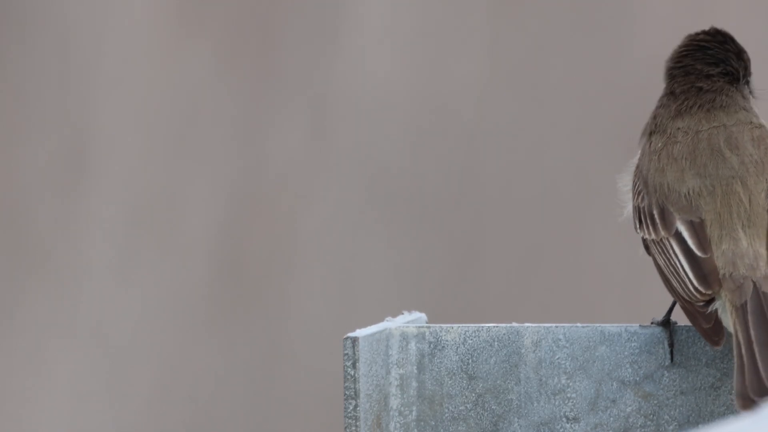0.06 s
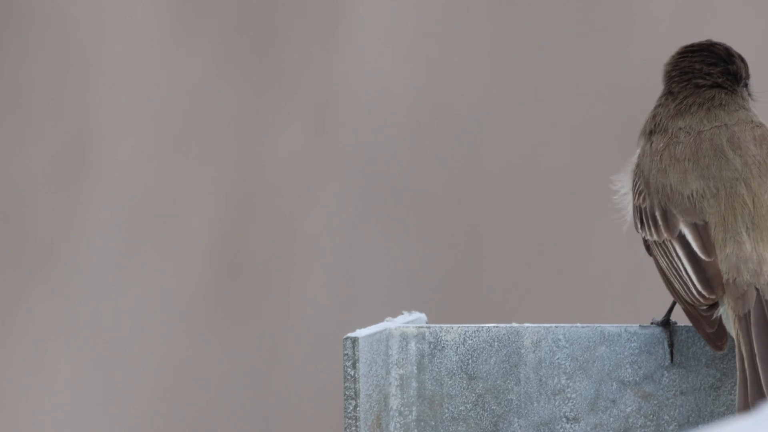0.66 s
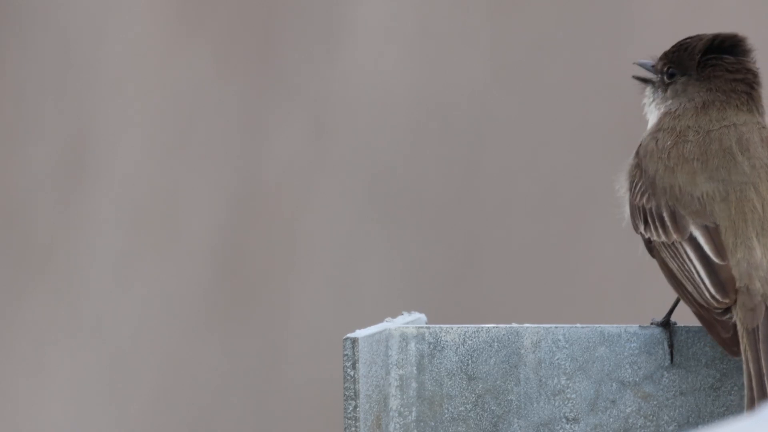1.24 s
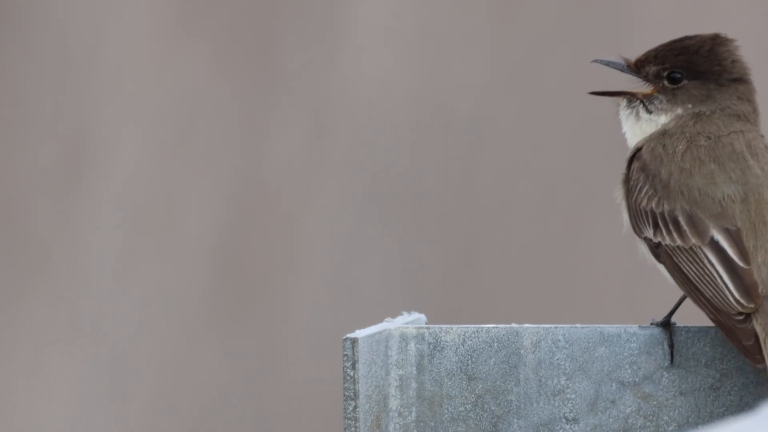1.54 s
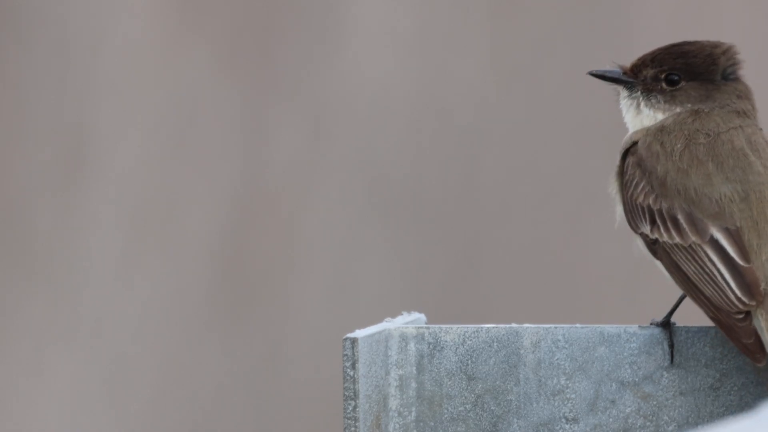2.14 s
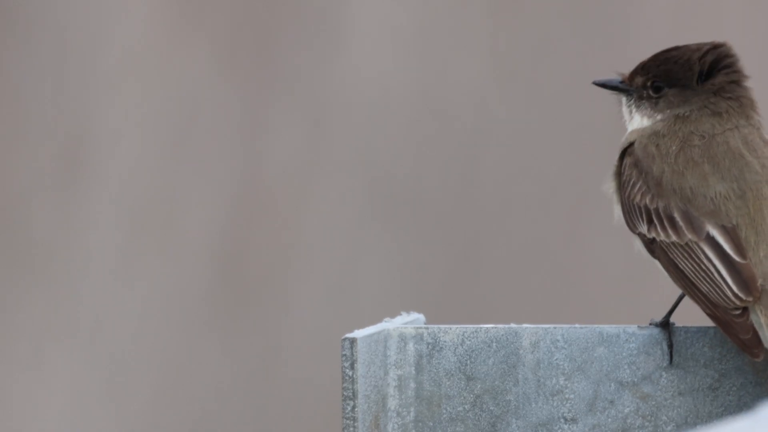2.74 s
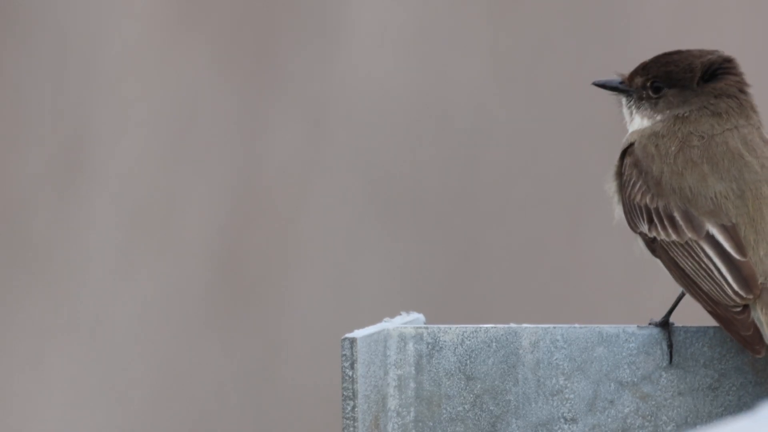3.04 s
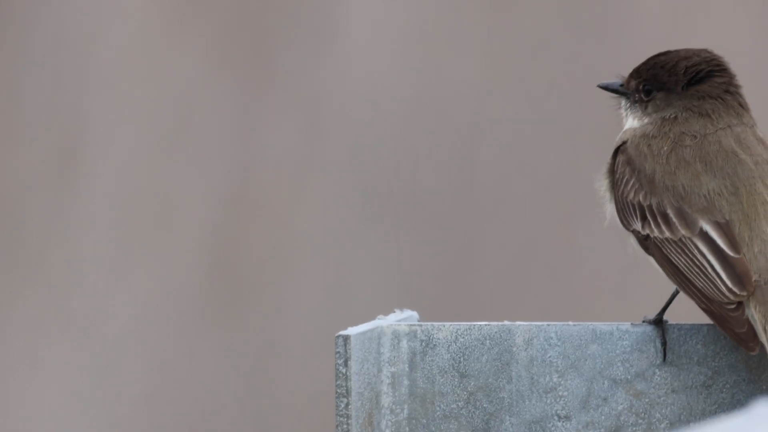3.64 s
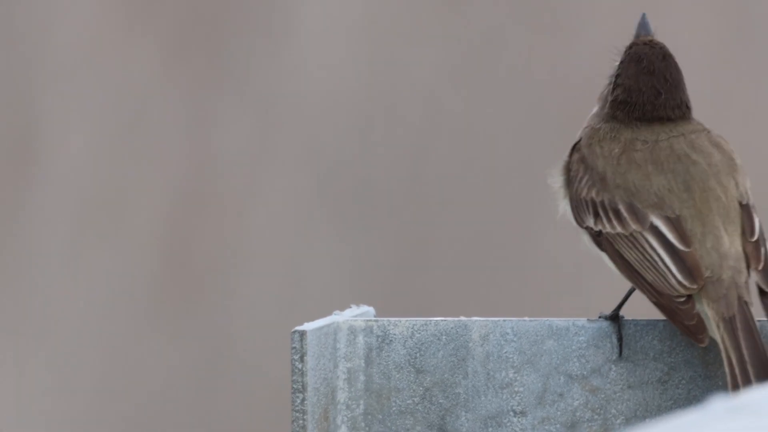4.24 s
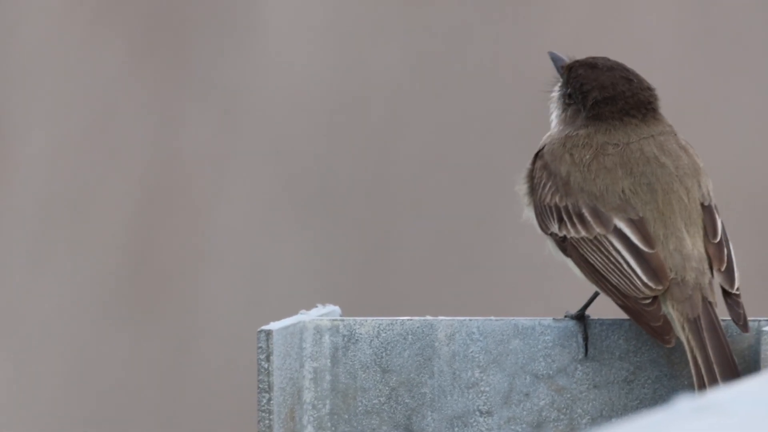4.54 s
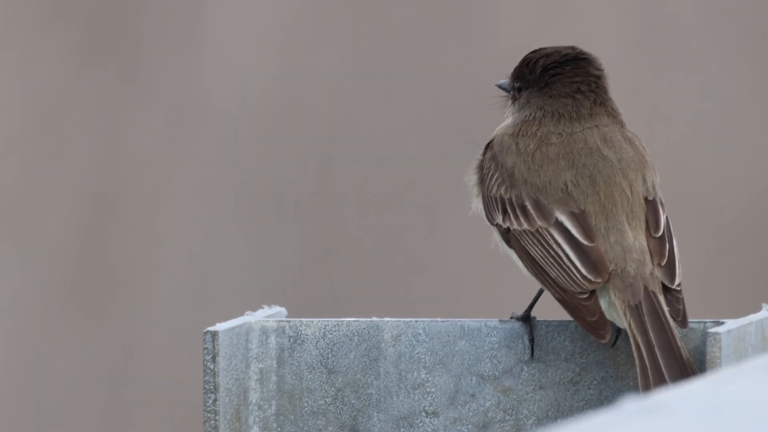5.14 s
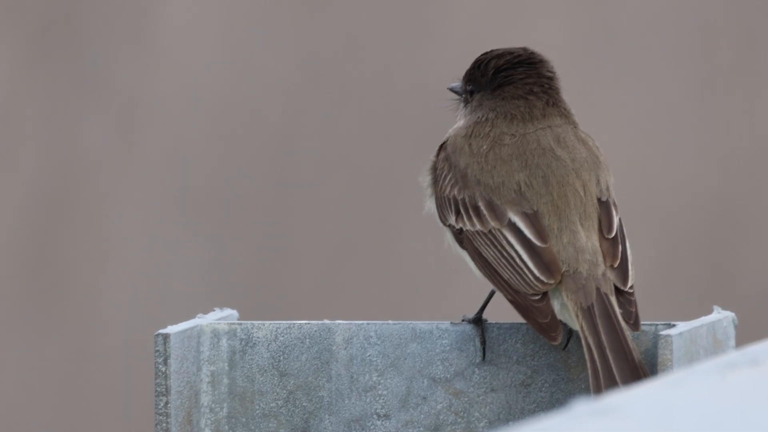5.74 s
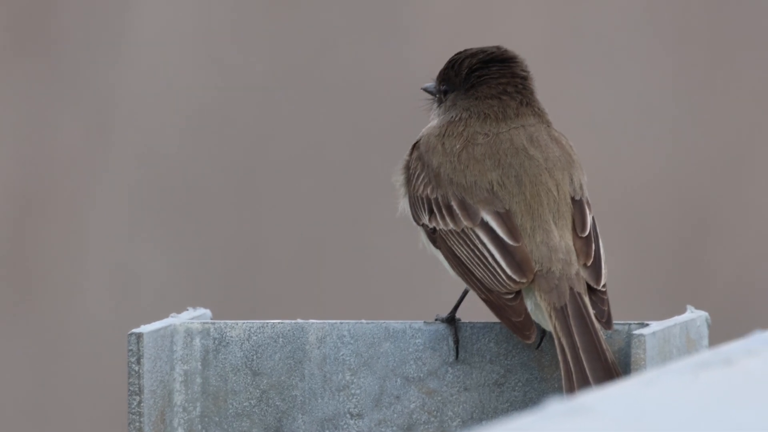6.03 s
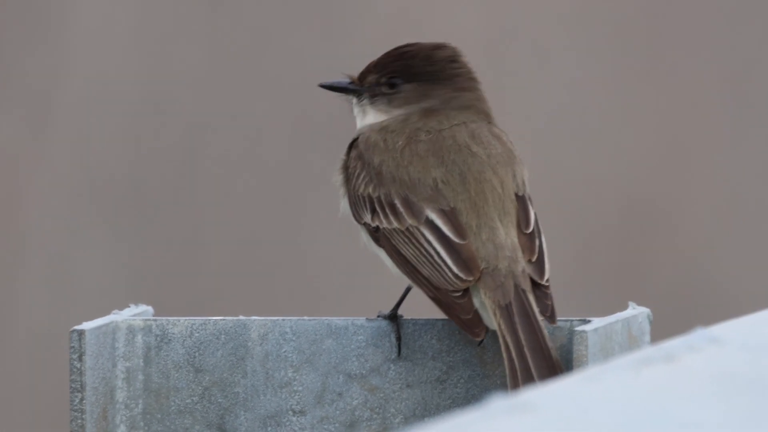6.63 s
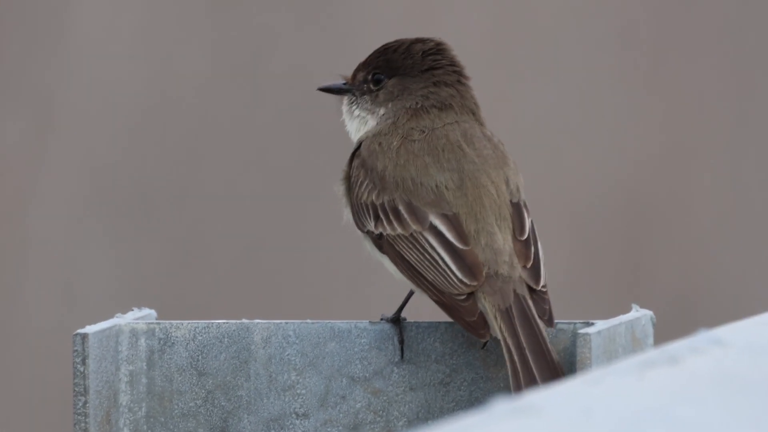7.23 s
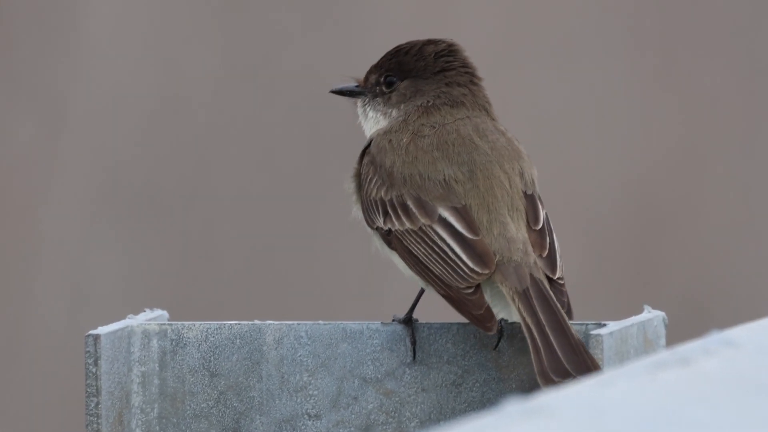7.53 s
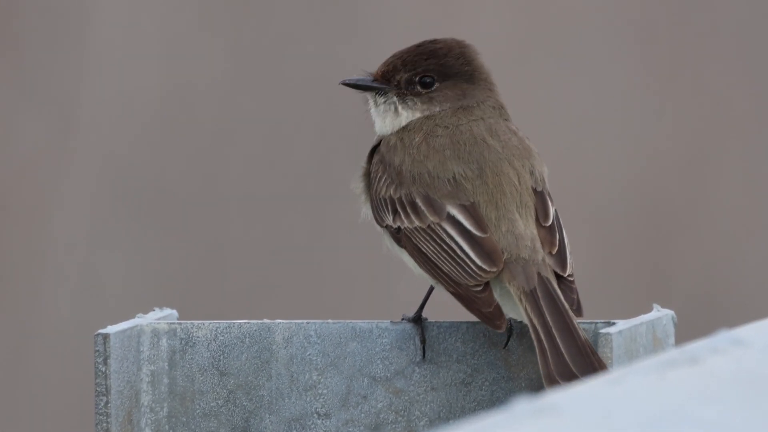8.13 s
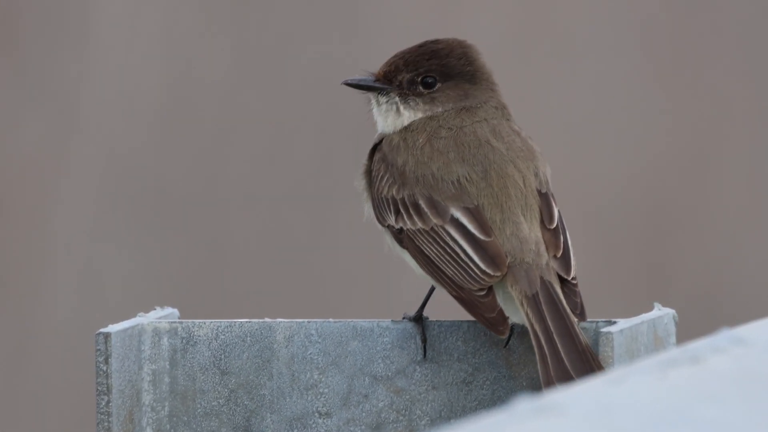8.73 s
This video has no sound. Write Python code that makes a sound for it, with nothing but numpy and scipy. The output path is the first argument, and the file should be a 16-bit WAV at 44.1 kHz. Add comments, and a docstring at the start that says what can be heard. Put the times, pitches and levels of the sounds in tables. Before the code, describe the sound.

Two close whistle-and-buzz songs from a small bird, separated by softer chirps and quick runs from other birds, with faint rustles.

```python
"""A low distant rumble comes first, with thin high notes and faint twitter from the trees. Close by, a
phoebe sings twice from a metal perch: an arched whistle, then a buzz whose pitch flicks up and down.
Its voice is a gliding tone filtered by throat and beak; nearby surfaces and the trees reflect it.
Between the songs other birds chirp, slur and whistle, among rustles and snaps of shaped noise
and a few ringing knocks and tinks."""
import sys
import numpy as np
from scipy import signal
from scipy.io import wavfile
from scipy.ndimage import map_coordinates

SR = 44100
rng = np.random.default_rng(int(sys.argv[2]) if len(sys.argv) > 2 else 0)


def put_to_file(sound):
    """Save the sound as 16-bit audio at rate SR, in the file named by the first command-line argument."""
    columns = np.atleast_2d(sound).T  # one column per channel
    safe = np.clip(columns, -1, 1)
    whole_steps = np.round(safe * 32767)
    wavfile.write(sys.argv[1], SR, whole_steps.astype(np.int16))


N = 391608
TIME = np.arange(N) / SR
CUTOFF_HZ = 15750


def amp(db):
    """Decibels as an amplitude ratio."""
    return 10 ** (np.asarray(db) / 20)


def rms_one(x):
    """Normalisation to unit power."""
    return x / np.sqrt(np.mean(x ** 2) + 1e-20)


def at_hz(points, hz):
    """Interpolation on a log-frequency axis."""
    f, value = np.transpose(points)
    return np.interp(np.log(hz), np.log(f), value)


def add(track, s, sound):
    """Superposition of a sound on the track at s seconds."""
    i = max(round(s * SR), 0)
    track[i:i + len(sound)] += sound[:max(N - i, 0)]


def drift(t, rate):
    """Smooth random fluctuation with a spread near 1."""
    knots = rng.standard_normal(int((t[-1] - t[0]) * rate) + 4)
    return map_coordinates(knots, [(t - t[0]) * rate + 1], order=2)


def fade(count):
    """A cosine taper over a note's first and last two milliseconds."""
    return signal.windows.tukey(count, min(1, SR / 250 / count))


def envelope(t, attack_s, release_s, edge_db):
    """Attack, hold and release, in dB relative to the held level."""
    return edge_db * np.maximum(0, np.maximum(1 - (t - t[0]) / attack_s, 1 - (t[-1] - t) / release_s))


def band(x, low_hz, high_hz):
    """Band-pass filtering between two frequencies."""
    return signal.sosfilt(signal.butter(2, [low_hz, high_hz], "band", fs=SR, output="sos"), x)


def tone(hz, db, partials_db, jitter):
    """A harmonic series on an unsteady fundamental; db is the rms of a 0 dB partial."""
    hz = hz * (1 + jitter * drift(np.arange(len(hz)) / SR, 300.3))
    phase = 2 * np.pi * np.cumsum(hz) / SR
    wave = sum(amp(p) * np.sin(k * phase) * (k * hz < SR / 2) for k, p in enumerate(partials_db, 1))
    return np.sqrt(2) * amp(db) * wave * fade(len(hz))


def glide(length, hz, db, sweep=0, arch=0, jitter=.013, partials_db=(0,)):
    """A glissando that swells and fades; sweep (slide) and arch (droop at the ends) are shares of hz."""
    u = np.linspace(0, 1, max(int(length * SR), 2))
    bend = 1 + sweep * (u - .5) - arch * (2 * u - 1) ** 2
    return tone(hz * bend, db, partials_db, jitter) * np.sin(np.pi * u) ** 0.703


def noise(colour, coherence):
    """Partly coherent stereo noise: each half-octave has its own level and left-right correlation."""
    out, edges = 0, 30 * 2 ** (np.arange(19) / 2)
    white = rng.standard_normal((2, 2, N))
    for k, (low, high) in enumerate(zip(edges, edges[1:])):
        hz = np.sqrt(low * high)
        if colour[0][0] <= hz <= colour[-1][0]:
            mid, side = band(white[k % 2], low, high)
            alike = np.clip(at_hz(coherence, hz), -1, 1)
            stereo = np.sqrt(1 + alike) * mid + np.sqrt(1 - alike) * side * [[1], [-1]]
            out = out + amp(at_hz(colour, hz)) * stereo
    return rms_one(out)


def ring(force, modes):
    """Modal resonance: a force drives a set of damped oscillators."""
    out = 0
    for hz, db, t60 in modes:
        r, w = amp(-60 / (t60 * SR)), 2 * np.pi * hz / SR
        out = out + amp(db) * signal.lfilter([0, np.sin(w)], [1, -2 * r * np.cos(w), r * r], force + 1e-18)
    return out


def trees(x, wet_db, t60, dull_hz, build_s=0.0013):
    """Scattering from trunks and branches adds a duller tail that builds up and dies in ragged clumps."""
    t = TIME[:SR]
    shared, left, right = rng.standard_normal((3, SR))
    ragged_db = 5 * np.tanh(drift(t, 90))
    onset = (t > .006) * (1 - np.exp(-t / build_s))
    tail = (shared + 0.6 * np.array([left, right])) * amp(-60 * t / t60 + ragged_db) * onset
    tail = signal.sosfilt(signal.butter(2, dull_hz, fs=SR, output="sos"), tail / np.linalg.norm(tail[0]))
    return x + amp(wet_db) * signal.fftconvolve(x[None], tail, axes=1)[:, :N]


# Spectrum of the open air. Each row: frequency in Hz, relative level in dB.
AIR_SPECTRUM = [(30, -46), (145, 2), (830, -14), (1330, -20), (2550, -22), (8060, -36), (15500, -56)]
# Its loudness over time. Each row: time in seconds, gain in dB.
AIR_GAIN = [(0, -70), (.8, -61), (8.88, -62)]
# Its likeness in the two ears. Each row: frequency in Hz, correlation.
AIR_COHERENCE = [(60, 0.23), (400, 0.88), (10000, 0.11)]
def air():
    """Ambient noise: faint broadband hiss and a distant rumble gathered around one low resonance."""
    broadband = noise(AIR_SPECTRUM, AIR_COHERENCE)
    shared, own = rng.standard_normal(N), rng.standard_normal((2, N))
    drone_hz, t60 = 151, 0.13
    drone = rms_one(ring(np.gradient(shared + own, axis=1), [(drone_hz, 0, t60)]))
    return amp(np.interp(TIME, *np.transpose(AIR_GAIN))) * (amp(-1) * broadband + amp(-3) * drone)


# Very high, thin notes. Each row: start in seconds, length in seconds.
THIN_NOTES = [(0.024, 0.053), (0.31, 0.2), (0.54, 0.17), (0.753, 0.15), (0.899, 0.23)]
def thin_notes():
    """Pure tones waver by random frequency modulation; the run sinks in pitch and grows louder."""
    out = np.zeros(N)
    floor_hz, excess_hz, settle_s = 6160, 1000, 0.17
    for s, length in THIN_NOTES:
        t = np.arange(s, s + length, 1 / SR)
        hz = floor_hz + excess_hz * np.exp(-t / settle_s)
        db = -71.5 + 19.5 * t[0] + envelope(t, attack_s=0.0072, release_s=0.035, edge_db=-21)
        add(out, s, tone(hz * (1 + 0.024 * drift(t, 40.3)), db, [0], jitter=0.013))
    return out


def twitter(low_hz=2006, high_hz=3790, bend=0.11, per_s=14, loudest_s=3.68):
    """A random stream of short glides, most of them falling; longer ones are louder."""
    out = np.zeros(N)
    starts = np.arange(0, N / SR, 1 / per_s)
    for s, (late, long, high, tilt) in zip(starts, rng.random((len(starts), 4))):
        db = -58 - 5 * abs(s - loudest_s) + 10 * (long - .5)
        hz = low_hz * (high_hz / low_hz) ** high
        add(out, s + late / 20, glide(0.027 * (1 + long), hz, db, sweep=bend * (6 * tilt - 4), arch=bend))
    return out


HOOK_S, HOOK_ARCH = 0.044, 0.1
# Short hooked notes. Each row: start in seconds, top pitch in Hz, level in dB.
HOOKED_NOTES = [(0.939, 2665, -58.5), (1.141, 2850, -55), (2.356, 3985, -53.5), (3.012, 4030, -45.5),
                (3.522, 3340, -52), (3.879, 5390, -50.5), (4.426, 2374, -42), (8.79, 2220, -61)]
def hooks():
    """Pure tones whose frequency rises and falls along a parabola."""
    out = np.zeros(N)
    for s, hz, db in HOOKED_NOTES:
        add(out, s, glide(HOOK_S, hz, db, arch=HOOK_ARCH))
    return out


# Drawn-out calls. Each row: start and length in seconds, middle pitch in Hz, sweep share, level in dB.
DRAWLED_CALLS = [(1.227, 0.13, 731, -0.022, -59.5), (3.184, 0.15, 763, -0.14, -53),
                 (3.653, .26, 775, -0.18, -54)]
# Their harmonics in dB, from the fundamental up.
DRAWL_HARMONICS = [-30.5, 0, -10, -4.5]
def drawls():
    """A weak fundamental under strong harmonics gives these sinking calls a nasal timbre."""
    out = np.zeros(N)
    for s, length, hz, sweep, db in DRAWLED_CALLS:
        add(out, s, glide(length, hz, db, sweep, partials_db=DRAWL_HARMONICS))
    return out


# Resonance of the throat and open beak. Each row: frequency in Hz, gain in dB.
THROAT_RESPONSE = [(3000, -16), (4300, -4), (4750, .5), (5200, 0), (6200, -12), (7800, -16.5),
                   (9500, -28.5), (11600, -25)]
def syrinx(t, hz, effort_db, overtone_db, jitter, shimmer_db):
    """Source and filter: the throat colours each harmonic of the phoebe's voice as it glides."""
    hz = hz * (1 + jitter * drift(t, 350.6))
    phase = 2 * np.pi * np.cumsum(hz) / SR
    soft_db = 1.7 * (effort_db - effort_db.max())   # the top overtones fade in soft singing
    wave = 0
    for k in range(1, 5):
        db = at_hz(THROAT_RESPONSE, k * hz) + overtone_db * (k > 1) + soft_db * max(k - 2, 0)
        wave = wave + amp(db) * np.sin(k * phase) * (k * hz < SR / 2)
    return np.sqrt(2) * amp(effort_db + shimmer_db * drift(t, 200)) * wave * fade(len(t))


# First note of each song. Each row: time of the top in seconds, top pitch in Hz,
# rise and fall in seconds, effort in dB.
ARCHED_NOTES = [(1.447, 4722, .152, .09, -20.5), (6.95, 4800, .123, 0.094, -21.5)]
def phoebe_whistles(foot_hz=2542, roundness=1.85):
    """A near-parabolic glide carries the fundamental up into the throat resonance and down again."""
    out = np.zeros(N)
    for top_s, top_hz, rise, fall, db in ARCHED_NOTES:
        t = np.arange(-rise, fall, 1 / SR)
        hz = top_hz - (top_hz - foot_hz) * np.maximum(-t / rise, t / fall) ** roundness
        hz = hz * (1 + .005 * drift(t, 110))
        effort_db = db + envelope(t, attack_s=.07, release_s=.044, edge_db=-18)
        add(out, top_s - rise, syrinx(t, hz, effort_db, overtone_db=-18, jitter=0.014, shimmer_db=3))
    return out


# Second note of each song. Each row: start and length in seconds, effort in dB,
# time of one crest in seconds, flicks per second.
BUZZ_NOTES = [(1.572, 0.186, -21.7, 1.587, 82.4), (7.072, 0.195, -22.7, 7.0925, 82.5)]
def phoebe_buzzes(start_hz=2757, settled_hz=3790, settle_s=.04):
    """Frequency modulation: each flick of pitch into the throat resonance is heard as a pulse."""
    out = np.zeros(N)
    swing_hz, half_width_s, creep_hz = 1195, 0.0022, 129
    for s, length, db, crest_s, per_s in BUZZ_NOTES:
        t = np.arange(0, length, 1 / SR)
        trough_hz = settled_hz + (start_hz - settled_hz) * np.exp(-t / settle_s)
        cycle = (per_s * (s + t - crest_s)) % 1
        flick = np.exp(-(np.minimum(cycle, 1 - cycle) / per_s / half_width_s) ** 2)
        hz = trough_hz + swing_hz * flick - creep_hz * np.sin(2 * np.pi * cycle)
        effort_db = db + envelope(t, attack_s=.048, release_s=.013, edge_db=-18)
        add(out, s, syrinx(t, hz, effort_db, overtone_db=-15.5, jitter=0.016, shimmer_db=1.6))
    return out


def high_scatter(x, above_hz, wet_db, t60):
    """Directivity: overtones beam away from the beak and arrive by reflection, unlike in each ear."""
    t = TIME[:SR // 4]
    tail = rng.standard_normal((2, len(t))) * amp(-60 * t / t60)
    high = signal.sosfilt(signal.butter(8, above_hz, "high", fs=SR, output="sos"), x)
    return amp(wet_db) * signal.fftconvolve(high[None], tail / np.linalg.norm(tail[0]), axes=1)[:, :N]


# Reflections around the perch. Each row: delay in seconds, gain in dB.
PERCH_ECHOES = [(.0021, -11.5), (.0062, -14)]
def phoebe():
    """Two songs as direct sound, early reflections and reverberation from the trees."""
    whistle, buzz = phoebe_whistles(), phoebe_buzzes()
    direct = whistle + buzz
    near = direct + sum(amp(db) * np.interp(TIME - delay, TIME, direct) for delay, db in PERCH_ECHOES)
    side_echo = amp(-21.5) * np.interp(TIME - .009, TIME, direct) * [[1], [-1]]   # widens the song
    spill = buzz + amp(-0.5) * whistle   # less of the whistle reaches the trees
    far = trees(spill, wet_db=-19.5, t60=0.5, dull_hz=4600, build_s=0.12) - spill
    return near + side_echo + far + high_scatter(near, above_hz=6400, wet_db=-0.5, t60=0.098)


def seesaw(start_s=1.592, period_s=.177, count=5):
    """Periodic alternation of a falling note and a low pip."""
    out = np.zeros(N)
    for s in start_s + period_s * np.arange(count):
        add(out, s, glide(0.05, hz=2737, db=-55.5, sweep=-0.243))
        add(out, s + .074, glide(0.0286, hz=2320, db=-57, arch=HOOK_ARCH))
    return out


# Hollow knocks. Each row: time in seconds, strength of the blow in dB.
KNOCK_BLOWS = [(2.421, -48), (8.392, -48)]
# Their modes. Each row: frequency in Hz, gain in dB, 60 dB decay time in seconds.
KNOCK_RESONANCES = [(936, 15, 0.034), (1816, -5, 0.058)]
def knocks():
    """Impulse response: single blows ring two modes, like drips on wood."""
    blows = np.zeros(N)
    for s, db in KNOCK_BLOWS:
        add(blows, s, amp([db]))
    return band(ring(blows, KNOCK_RESONANCES), low_hz=466, high_hz=2400)


def trill(start_s=2.577, period_s=.086, count=5, hz=2990):
    """Periodic repetition of a hooked note, each a little off pitch."""
    out = np.zeros(N)
    for s in start_s + period_s * np.arange(count):
        add(out, s, glide(HOOK_S, hz * rng.normal(1, 0.0283), db=-51, arch=HOOK_ARCH))
    return out


# Long whistles. Each row: start and length in seconds, middle pitch in Hz, sweep share, level in dB.
LONG_WHISTLES = [(2.937, 0.082, 2180, 0, -51), (3.38, .09, 2185, -0.013, -51.5),
                 (3.823, 0.14, 2813, -0.15, -50.5), (4.227, 0.22, 2650, 0.2, -48),
                 (5.968, 0.23, 2864, -.06, -57.5), (7.579, .26, 2620, -.03, -68),
                 (8.692, 0.052, 2720, 0.11, -63)]
def whistles():
    """Pure tones, level or swept linearly in frequency."""
    out = np.zeros(N)
    for s, length, hz, sweep, db in LONG_WHISTLES:
        add(out, s, glide(length, hz, db, sweep))
    return out


def hoarse(note):
    """Fast, irregular amplitude modulation turns a note into a rasp."""
    return note * (.7 + .6 * drift(TIME[:len(note)], 650))


# Nasal upslurs. Each row: start and length in seconds, middle pitch in Hz, sweep share, level in dB.
NASAL_CALLS = [(3.04, 0.075, 1734, 0.19, -48), (3.571, 0.066, 1800, 0.27, -45)]
# Their harmonics at the onset in dB, from the fundamental up.
NASAL_HARMONICS = [-18, -16.5, -6, -8.5]
def nasals():
    """The second harmonic swells as it rises into the throat resonance; a quick drop ends each call."""
    out = np.zeros(N)
    for s, length, hz, sweep, db in NASAL_CALLS:
        swell_db = np.linspace(0, 30.5, int(length * SR))
        partials_db = [p + swell_db * (k == 2) for k, p in enumerate(NASAL_HARMONICS, 1)]
        add(out, s, glide(length, hz, db, sweep, partials_db=partials_db))
        add(out, s + length, hoarse(glide(0.0164, hz=2760, db=db, sweep=-0.23)))
    return out


# Dry rustles, perhaps of wings. Each row: peak time in seconds, level in dB, swell and fade in seconds.
DRY_RUSTLES = [(3.281, -43, 0.077, 0.015), (4.42, -41, 0.028, 0.023), (5.813, -52.5, 0.048, 0.069),
               (8.052, -44.5, 0.084, 0.15)]
# Twig-like snaps. Each row: start in seconds, level in dB, 60 dB decay time in seconds.
TWIG_SNAPS = [(3.276, -34.5, 0.12), (3.346, -39, 0.2), (7.724, -46, 0.14), (8.273, -41.5, 0.082)]
# The spectrum of both. Each row: frequency in Hz, relative level in dB.
RUSTLE_SPECTRUM = [(200, -27.5), (2200, 5), (10200, -12), (15500, -29)]
def rustles():
    """Amplitude-modulated noise: grainy swells make rustles, exponential decays make snaps."""
    level = np.zeros(N)
    for s, db, swell, fall in DRY_RUSTLES:
        t = np.arange(-swell, fall, 1 / SR)
        grain_db = 2 * drift(t, 500) + 3.8 * drift(t, 43)
        add(level, s - swell, amp(db + envelope(t, swell, fall, edge_db=-23.5) + grain_db))
    t = TIME[:SR // 4]
    for s, db, t60 in TWIG_SNAPS:
        add(level, s, amp(db - 60 * t / t60))
    return level * noise(RUSTLE_SPECTRUM, coherence=[(500, 1.0), (12000, 0.096)])


# Low whirrs. Each row: peak time in seconds, level in dB, half width in seconds, centre in Hz.
LOW_WHIRRS = [(3.271, -50, 0.028, 720), (8.244, -54.5, 0.1, 353)]
def whirrs(edge_ratio=1.18):
    """Narrow-band air noise in short swells, perhaps pushed by wings."""
    out = 0
    for s, db, width, hz in LOW_WHIRRS:
        puff = band(rng.standard_normal(N), hz / edge_ratio, hz * edge_ratio)
        out = out + amp(db) * np.exp(-((TIME - s) / width) ** 2) * rms_one(puff)
    return out


# Hoarse calls. Each row: start in seconds, level in dB.
RASP_CALLS = [(3.401, -51), (8.121, -46)]
# Their harmonics in dB, from the fundamental up.
RASP_HARMONICS = [-12.5, 0.5, -1, -17]
def rasps(pulse_s=0.04):
    """Jitter and amplitude flutter roughen three quick rising pulses."""
    out = np.zeros(N)
    for s, db in RASP_CALLS:
        for k in range(3):
            hz = 1580 * rng.normal(1, .05)
            pulse = glide(pulse_s, hz, db, sweep=.2, arch=HOOK_ARCH, jitter=.05, partials_db=RASP_HARMONICS)
            add(out, s + k * pulse_s, hoarse(pulse))
    return out


# Thin, high tinks. Each row: start in seconds, strength of the crackle in dB.
TINK_CRACKLES = [(3.402, -41), (4.218, -41.5), (7.305, -34.5), (7.327, -29), (7.352, -44), (7.388, -40.5),
                 (7.44, -37), (7.514, -37.5)]
# Their modes. Each row: frequency in Hz, gain in dB, 60 dB decay time in seconds.
TINK_RESONANCES = [(8134, 9, 0.011), (9310, -2, 0.02)]
def tinks():
    """Forced resonance: a brief crackle, unlike in the two ears, drives two high modes."""
    force, t = np.zeros((2, N)), TIME[:SR // 8]
    burst = (1 - np.exp(-t / 0.00099)) * amp(-60 * t / 0.11)
    for s, db in TINK_CRACKLES:
        for ear in force:
            add(ear, s, amp(db) * burst * rng.standard_normal(len(t)) / np.linalg.norm(burst))
    return band(ring(force, TINK_RESONANCES), low_hz=6000, high_hz=CUTOFF_HZ)


# Burry notes. Each row: start and length in seconds, middle pitch in Hz, sweep share, level in dB.
BURRY_NOTES = [(3.656, 0.087, 3170, 0.145, -50), (3.771, 0.12, 4140, -0.099, -50)]
def burrs():
    """Random modulation spreads an arched tone into a scratchy band."""
    out = np.zeros(N)
    for s, length, hz, sweep, db in BURRY_NOTES:
        add(out, s, hoarse(glide(length, hz, db, sweep, HOOK_ARCH)))
    return out


def course(rows):
    """Linear interpolation of a contour: sample times, then each column at those times."""
    s, *columns = np.transpose(rows)
    t = np.arange(s[0], s[-1], 1 / SR)
    return [t] + [np.interp(t, s, c) for c in columns]


def slur(shape, starts, sag_per_s=0, partials_db=(0,)):
    """One glide, slightly transposed at each start; earlier ones lie higher by the sag."""
    out = np.zeros(N)
    t, hz, db = course(shape)
    for s in starts:
        tuning = rng.normal(1 + sag_per_s * (starts[-1] - s), 0.016)
        add(out, s + t[0], tone(hz * tuning, db, partials_db, jitter=0.025))
    return out


# Course of a chirp. Each row: time in seconds, pitch as a share of the top, gain in dB.
CHIRP_CONTOUR = [(0, 0.76, -19.5), (.011, 0.95, 1), (.019, 1, -3.5), (.03, .86, -18.5)]
# Course of a falling slur. Each row: time in seconds, pitch in Hz, level in dB.
FALL_CONTOUR = [(0, 2266, -47), (.014, 1902, -48), (.045, 1311, -64.5)]
# A quick run that slows and fades. Each row: start in seconds, level in dB.
QUICK_RUN = [(4.02, -37.5), (4.161, -33), (4.305, -33.5), (4.446, -33.5), (4.59, -33.5), (4.732, -34.5),
             (4.876, -36.5), (5.024, -37), (5.175, -37.5), (5.338, -39), (5.531, -36.5), (5.719, -35.5),
             (5.905, -36.5), (6.108, -42)]
def quick_singer(top_hz=3909, climb_hz_per_s=65, slurs_end_s=5.65):
    """Rapid frequency sweeps: bright hooked chirps, all but the last few followed by a falling slur."""
    chirps = np.zeros(N)
    t, bend, swell_db = course(CHIRP_CONTOUR)
    octave_db = -36 + 902 * t   # the octave comes out as the note hooks down
    for s, db in QUICK_RUN:
        hz = top_hz + climb_hz_per_s * (s - QUICK_RUN[0][0])
        beak_db = 3 * drift(t, 136)
        partials_db = [0, octave_db + beak_db, -28.5 + beak_db]
        add(chirps, s, tone(hz * bend ** rng.normal(1, 0.16), db + swell_db, partials_db, jitter=0.012))
    slurs = slur(FALL_CONTOUR, [s + .054 for s, _ in QUICK_RUN if s < slurs_end_s])
    song = trees(chirps + slurs, wet_db=-12.5, t60=0.36, dull_hz=6230)
    return song + high_scatter(chirps, above_hz=4000, wet_db=-3, t60=0.096)


# Soft thumps. Each row: peak time in seconds, level in dB, half width in seconds.
LOW_THUMPS = [(4.255, -39.5, 0.061), (8.858, -54, 0.042)]
# Their spectrum. Each row: frequency in Hz, relative level in dB.
THUMP_SPECTRUM = [(30, -13), (149, 4.5), (428, -38)]
def thumps():
    """Low-frequency noise under brief Gaussian envelopes."""
    level = sum(amp(db) * np.exp(-((TIME - s) / width) ** 2) for s, db, width in LOW_THUMPS)
    return level * noise(THUMP_SPECTRUM, AIR_COHERENCE)


# Upswing after a fall. Each row: time from the slur's start in seconds, pitch in Hz, level in dB.
RISE_CONTOUR = [(.04, 1268, -70), (.11, 1584, -52.5), (.152, 1690, -57.5)]
# A slower run. Each row: start in seconds, level in dB.
SLOW_RUN = [(4.732, -43), (4.976, -40), (5.221, -45.5), (5.471, -42.5), (5.721, -39.5), (5.993, -40),
            (6.271, -39.5), (6.544, -42.5)]
def slow_singer(top_hz=4630, sink_hz_per_s=290, chirp_s=0.031, climb_s=0.00498):
    """Pure chirps level off exponentially in pitch; after each, a slur falls and swings up again."""
    chirps, t = np.zeros(N), np.arange(0, chirp_s, 1 / SR)
    bend = 1 - .5 * np.exp(-t / climb_s)
    swell_db = envelope(t, attack_s=0.0088, release_s=0.0085, edge_db=-22.5)
    for s, db in SLOW_RUN:
        hz = top_hz - sink_hz_per_s * (s - SLOW_RUN[0][0])
        add(chirps, s, tone(hz * bend, db + swell_db, [0], jitter=0.023))
    starts = [s + .07 for s, _ in SLOW_RUN]
    rises = slur(RISE_CONTOUR, starts, sag_per_s=.11, partials_db=[0, -32, -33, -22.5])
    return trees(chirps + slur(FALL_CONTOUR, starts) + rises, wet_db=-10, t60=0.19, dull_hz=5300)


def swish(peak_s=8.03, db=-48, swell_s=0.139, fade_s=0.27):
    """High feather noise, uncorrelated between the ears, flutters and swells into the last rustle."""
    level, t = np.zeros(N), np.arange(-swell_s, fade_s, 1 / SR)
    swell_db = envelope(t, swell_s, fade_s, edge_db=-23.5) + 3.1 * drift(t, 114.7)
    add(level, peak_s - swell_s, amp(db + swell_db))
    return level * rms_one(band(rng.standard_normal((2, N)), low_hz=6700, high_hz=10300))


def panned(x, left_db):
    """A level difference between the ears places a sound to one side."""
    return x * amp([[left_db / 2], [-left_db / 2]])


def scene():
    """Superposition: the phoebe in front, everything else around it."""
    singers = panned(phoebe(), 0.3) + panned(quick_singer(), 4.5) + panned(slow_singer(), 1)
    pure_calls = whistles() + hooks() + trill() + seesaw() + twitter() + thin_notes()
    harsh_calls = nasals() + drawls() + burrs() + rasps()
    far_birds = trees(pure_calls + harsh_calls, wet_db=-6.5, t60=0.21, dull_hz=6960)
    small_noises = rustles() + swish() + whirrs() + knocks() + tinks()
    return singers + panned(far_birds, 5) + panned(small_noises, -2.5) + air() + thumps()


def record(dry):
    """A steep low-pass filter removes the highest treble."""
    return signal.sosfilt(signal.ellip(10, .1, 70, CUTOFF_HZ, fs=SR, output="sos"), dry)


dry = scene()
out = record(dry)
put_to_file(out)
```